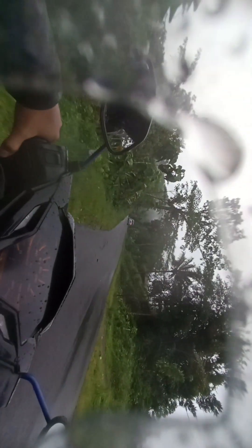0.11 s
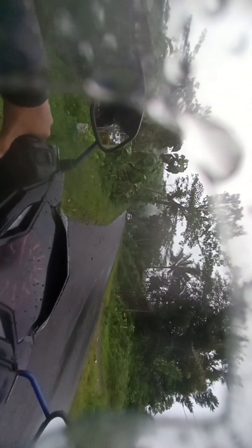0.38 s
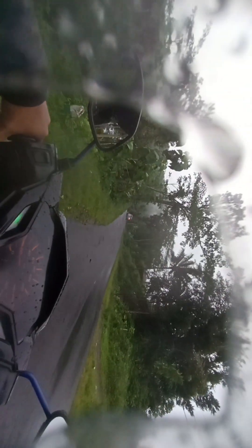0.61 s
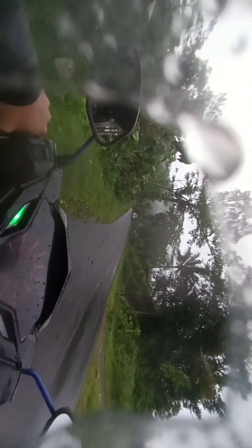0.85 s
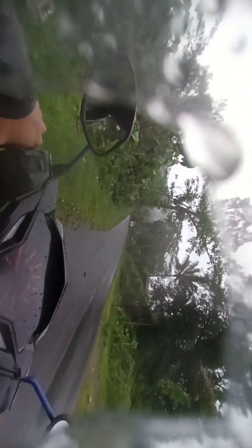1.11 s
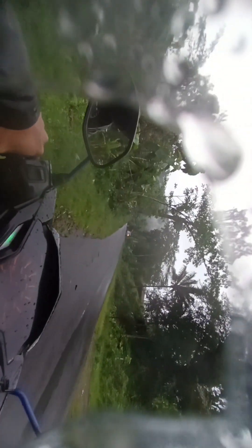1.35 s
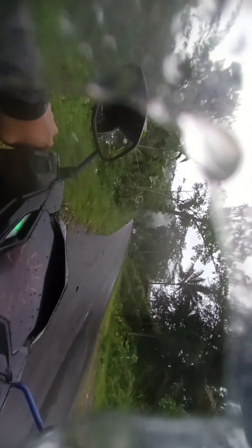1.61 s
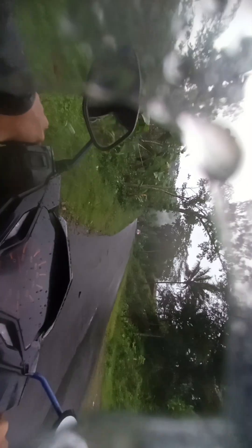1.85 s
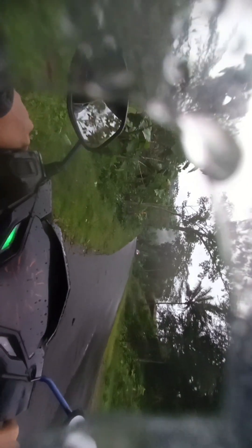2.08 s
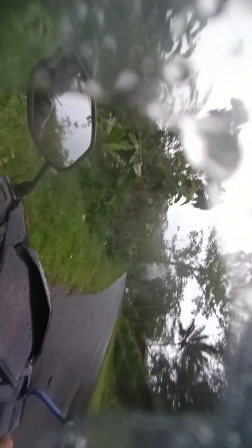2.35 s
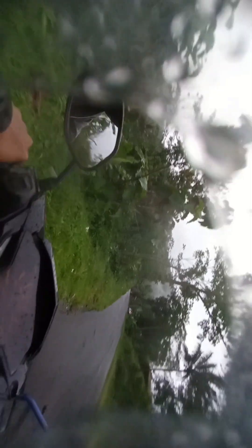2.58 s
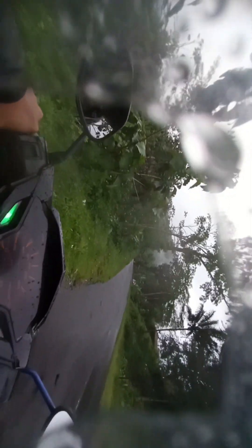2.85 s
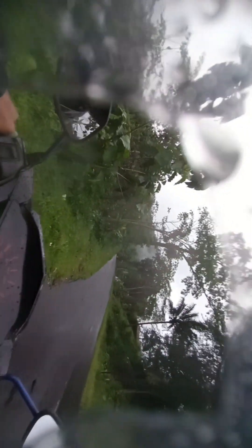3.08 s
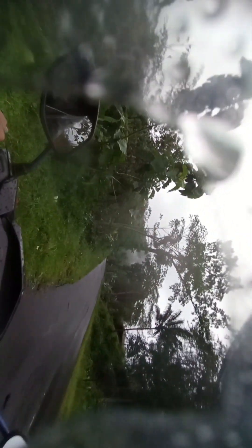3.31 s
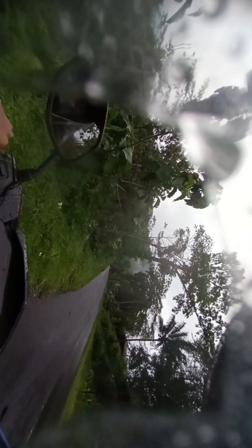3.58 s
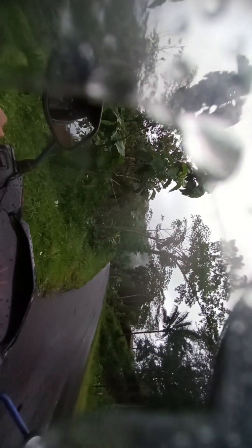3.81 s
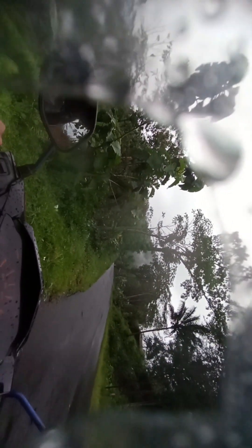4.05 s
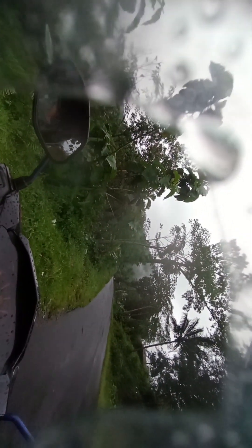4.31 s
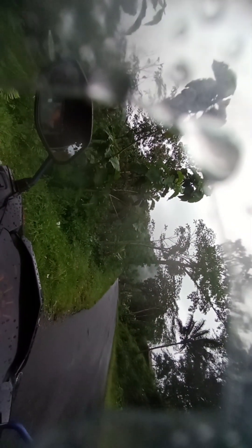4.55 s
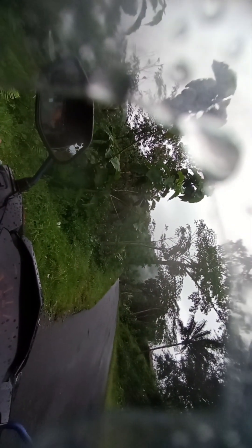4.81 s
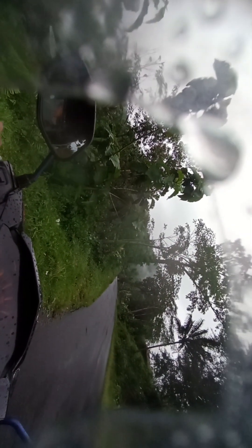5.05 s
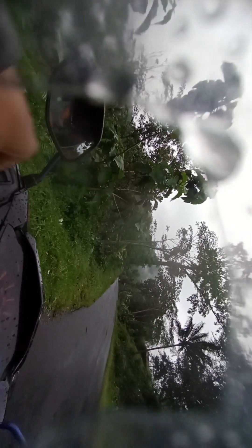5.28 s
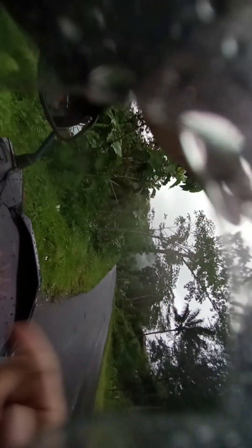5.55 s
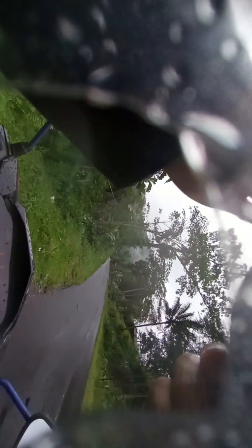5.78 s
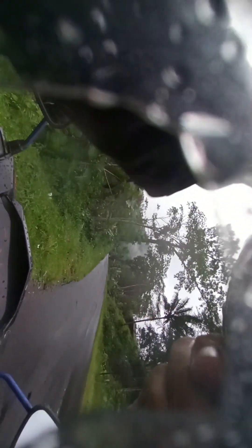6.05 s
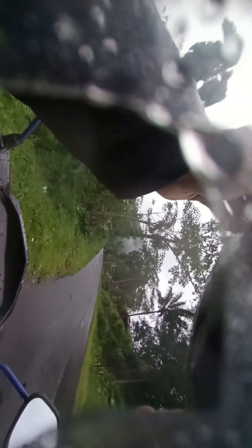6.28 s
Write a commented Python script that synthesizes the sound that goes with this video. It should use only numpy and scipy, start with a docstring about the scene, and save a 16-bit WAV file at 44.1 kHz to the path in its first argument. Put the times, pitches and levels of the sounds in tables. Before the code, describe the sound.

Boxy close-up of a motorbike engine dropping into uneven idle thumps, wet fabric rubbing and snapping, then a hand sliding and knocking on the shell.

```python
"""Small motorcycle slowing to idle, heard inside a housing

A single-cylinder engine slows and settles into a lumpy idle, heard from inside a sealed plastic housing.
Exhaust beats are gas puffs with echo, pipe ring and frame throb; shaken panels are resonated random clicks.
The brake squeaks faintly (wavering sines); wet cloth rubs, crackles and snaps (shaped clicks and noise).
Near the end a hand slides over the shell (banded hiss) and knocks on it (decaying modes)."""
import sys
import numpy as np
from scipy import signal
from scipy.fft import rfft, irfft
from scipy.io import wavfile
from scipy.ndimage import uniform_filter1d

SR = 44100
rng = np.random.default_rng(int(sys.argv[2]) if len(sys.argv) > 2 else 0)


def master(y):
    """Save y as 16-bit WAV."""
    cut = np.clip(np.atleast_2d(y).T, -1, 1)
    pcm = np.round(cut * 32767)  # scale
    wavfile.write(sys.argv[1], SR, pcm.astype(np.int16))


def level_to_linear(level):
    """Convert decibel levels to linear amplitude factors, elementwise."""
    exponent = np.asarray(level, float) / 20
    return 10 ** exponent


N = 282240

# Engine speed. Each row: time in seconds, firings per second.
ENGINE_SPEED = [(0.0, 23.616), (0.5, 21.642), (0.8, 20.448), (1.4, 14.755), (1.8, 12.887), (2.1, 12.479),
                (2.8, 12.801), (3.2, 12.196), (3.5, 13.213), (3.8, 12.221), (4.1, 12.939), (5.0, 12.9),
                (5.3, 13.272), (5.8, 12.226), (6.1, 13.196), (6.4, 12.626)]
IDLE_PER_S = 12.7


def rms_one(x):
    """Scales a signal to rms 1."""
    return x / np.sqrt(np.mean(x ** 2) + 1e-20)


def in_time(rows, outside=None):
    """Columns of a curve, sample by sample."""
    s, *columns = np.transpose(rows)
    return [np.interp(np.arange(N) / SR, s, c, outside, outside) for c in columns]


def drift(rate_hz):
    """Slow chance of spread 1: noise through two equal poles."""
    r = np.exp(-2 * np.pi * rate_hz / SR)
    return rms_one(signal.lfilter([1], [1, -2 * r, r * r], rng.standard_normal(N + SR))[SR:])


def colour(x, spectrum):
    """Weights a signal by a smooth spectrum of (Hz, dB) points."""
    hz, db = np.transpose(spectrum)
    f = np.maximum(np.arange(N // 2 + 1) * SR / N, 1)
    return irfft(rfft(x) * level_to_linear(np.interp(np.log(f), np.log(hz), db)), N)


def band_rms(x, low_hz, high_hz):
    """Rms of one band."""
    power = np.abs(rfft(x)[int(low_hz * N / SR):int(high_hz * N / SR)]) ** 2
    return np.sqrt(2 * power.sum()) / N


def butter_filter(x, order, hz, kind="low"):
    """Causal Butterworth filter."""
    return signal.sosfilt(signal.butter(order, hz, kind, fs=SR, output="sos"), x)


def zero_phase_high_pass(x, order, hz):
    """Butterworth high-pass run forward and backward."""
    return signal.sosfiltfilt(signal.butter(order, hz, "high", fs=SR, output="sos"), x)


def resonate(x, hz, width_hz):
    """One resonance, gain 1 on top."""
    r = np.exp(-np.pi * width_hz / SR)
    poles = [1, -2 * r * np.cos(2 * np.pi * hz / SR), r * r]
    return signal.lfilter([(1 - r * r) / 2, 0, (r * r - 1) / 2], poles, x)


def grains(per_s, spread_db):
    """Random clicks of very uneven size; their power does not depend on the rate."""
    sizes = level_to_linear(spread_db * np.minimum(rng.exponential(1, N), 4)) * rng.choice([-1, 1], N)
    happens = rng.random(N) < per_s / SR
    return rms_one(sizes) * happens * np.sqrt(SR / per_s) + 1e-18


def panels(table, patchy_db, per_s):
    """Every panel is shaken on its own and rings up and fades in patches; rms 1."""
    total = 0
    for hz, width_hz, db in table:
        shaking = grains(900, spread_db=3.0) * level_to_linear(patchy_db * drift(per_s))
        ring = resonate(resonate(shaking, hz, width_hz), hz, 2 * width_hz)
        total = total + level_to_linear(db) * rms_one(ring)
    return rms_one(total)


def patches(x, bands_hz, patchy_db, per_s):
    """Folds move: each band swells and fades on its own."""
    for hz in bands_hz:
        gain = level_to_linear(patchy_db * np.clip(drift(per_s), -3, 2))
        x = x + (gain - 1) * resonate(x, hz, hz / 9)
    return x


def housing(x):
    """Each air or wall resonance of the shell lifts its own band."""
    # Each row: frequency in Hz, width in Hz, lift in dB.
    shell_resonances = [(359, 14, 10), (630, 720, -1), (686, 90, 14), (906, 150, 5.5), (1172, 36, 4.5),
                        (1760, 490, 5), (2600, 310, 1.5), (3680, 970, 8), (3400, 120, -3.5), (6940, 170, 0)]
    for hz, width_hz, lift_db in shell_resonances:
        x = x + (level_to_linear(lift_db) - 1) * resonate(x, hz, width_hz)
    return x


def whistles(touches, rise_share, fade_db, waver, flutter_db):
    """Thin, unsteady tones of rubbing metal: each swells, then fades."""
    out, t = 0, np.arange(N) / SR
    for s, length_s, hz, db in touches:
        corners_s = [s, s + rise_share * length_s, s + length_s]
        level_db = np.interp(t, corners_s, db - np.array([fade_db, 0, fade_db]), -140, -140)
        phase = 2 * np.pi * np.cumsum(hz * (1 + waver * drift(12))) / SR
        out = out + uniform_filter1d(level_to_linear(level_db), size=200) * np.sqrt(2) * np.sin(phase)
    return out * level_to_linear(flutter_db * drift(40))


def brake_squeaks():
    """The brake rubs: faint high tones, quick to swell."""
    # Each row: start in seconds, length in seconds, frequency in Hz, level in dB.
    squeaks = [(1.318, .03, 8400, -61), (2.083, 0.13, 8410, -53), (2.303, .04, 8400, -83),
               (3.58, 0.15, 8500, -65)]
    return whistles(squeaks, rise_share=0.08, fade_db=30.0, waver=.004, flutter_db=5.5)


def frame_creaks():
    """The frame creaks: short tones, slower to swell."""
    # Each row: start in seconds, length in seconds, frequency in Hz, level in dB.
    creaks = [(.87, 0.11, 1260, -44.5), (2.29, 0.051, 2500, -54), (2.47, 0.076, 2500, -64),
              (3.29, 0.11, 1220, -52.5), (3.62, 0.061, 2500, -62)]
    return whistles(creaks, rise_share=0.4, fade_db=8.0, waver=0.0058, flutter_db=4.5)


def hand():
    """Wet skin sliding over the shell drags with a muffled, banded hiss, higher as it slides off."""
    # Each row: time in seconds, level in dB.
    slide = [(5.82, -51), (5.9, -51), (5.95, -47.5), (5.99, -35.5), (6.03, -25), (6.055, -44.5),
             (6.08, -28), (6.2, -46.5), (6.26, -40.5), (6.33, -41.5), (6.4, -42.5)]
    slide_treble = [(6.19, -64), (6.24, -57), (6.3, -58), (6.36, -48.5), (6.4, -43)]
    # Each row: frequency in Hz, width in Hz, level in dB.
    skin_rings = [(1040, 33, 10), (1300, 360, 13.5), (1610, 78, 9), (2600, 320, -14), (1840, 63, -1.5),
                  (2500, 160, 3), (2800, 80, -3), (3280, 74, -16.5)]
    skin_treble = [(1500, 400, 2), (2000, 250, -1), (2500, 200, -2), (2850, 200, 0), (3250, 220, -1),
                   (3900, 300, -10)]
    high = level_to_linear(in_time(slide_treble, outside=-120)[0]) * panels(skin_treble, patchy_db=4.5, per_s=20)
    return level_to_linear(in_time(slide, outside=-120)[0]) * panels(skin_rings, patchy_db=4.0, per_s=10) + high


def knocks():
    """Each blow rings all the shell's modes and leaves a dying rattle; a soft contact takes the top off."""
    # Each row: time in seconds, peak in dB, contact hardness (low-pass) in Hz.
    blows = [(5.775, -16, 450), (5.935, -19, 400), (5.949, -18, 700), (5.959, -8, 900), (5.969, -13, 450),
             (5.99, -5, 700), (5.9945, -10, 600), (5.998, -9, 1500), (6.0176, -.3, 2200), (6.055, -17, 550),
             (6.0926, -.3, 2800), (6.134, -12, 1300)]
    # Struck housing. Each row: frequency in Hz, level in dB, t60 in seconds.
    shell_modes = [(342, -20, .08), (412, 5, 0.049), (582, 5.5, 0.066), (728, 19.5, 0.015),
                   (1100, 10.5, 0.023), (1200, -12, 0.052), (1480, -16.5, 0.029), (1863, 10, 0.019),
                   (2570, -6, 0.018), (3320, -0.5, 0.023)]
    out, t = np.zeros(N + 4000), np.arange(4000) / SR
    hz, mode_db, t60_s = np.transpose(shell_modes)[:, :, None]
    chance_db = rng.standard_normal((len(blows), len(hz), 1))
    shake = butter_filter(rng.standard_normal((len(blows), len(t))), 2, [300, 1800], "band")
    for (s, db, hard_hz), luck_db, noise in zip(blows, chance_db, shake):
        blow = -np.sum(level_to_linear(mode_db + luck_db - 60 * t / t60_s) * np.sin(2 * np.pi * hz * t), axis=0)
        blow += (level_to_linear(-2 - 60 * t / .02) + level_to_linear(-11 - 60 * t / .12)) * noise
        blow = butter_filter(blow, 3, hard_hz)
        blow = butter_filter(blow, 2, 240, "high")
        at = round(s * SR)
        out[at:at + len(t)] += level_to_linear(db) * blow / np.abs(blow).max()
    return out[:N]


def snaps():
    """Each sharp snap of the cloth is a short noise burst around its own pitch, with a softer rustle."""
    # Each row: time in seconds, burst level in dB, pitch in Hz.
    cloth_snaps = [(0.0679, -26, 3700), (0.0665, -32, 6300), (2.1882, -36.5, 6000), (2.2106, -37.5, 5800),
                   (2.6843, -44, 1970), (2.6928, -34, 3450), (3.6147, -37, 4100), (3.9733, -30.5, 4200),
                   (4.316, -28.5, 2730), (4.326, -29, 3600), (4.384, -37, 5360), (4.3914, -39, 3880),
                   (4.44, -39, 3450), (4.462, -33, 3400), (4.4777, -29, 3300), (4.4984, -23.5, 3750),
                   (4.5152, -22.5, 3380), (4.5322, -25.5, 3230), (4.5428, -27.5, 3280), (4.6179, -27, 3500),
                   (4.628, -19.5, 3850), (4.6382, -27, 3180), (4.6606, -38, 3670), (4.672, -26.5, 3300),
                   (4.68, -25.5, 3380), (4.694, -29.5, 3480), (4.7037, -31, 3020), (4.74, -36.5, 3840),
                   (4.8184, -38, 3800), (4.845, -38, 3790), (4.8985, -41, 3670), (5.0548, -37, 2070),
                   (5.0728, -34, 3340), (5.1, -29.5, 3280), (5.1257, -33, 3280), (5.1356, -39, 3330),
                   (5.2971, -26.5, 3150), (5.3498, -26, 1970), (5.351, -26.5, 7000), (5.405, -30, 4900),
                   (5.538, -38, 6560), (5.554, -33, 6200), (5.57, -48, 6600), (5.593, -27, 6650),
                   (5.712, -35, 6600)]
    burst_t60_s, edge_db = 0.0044, -11   # edge: wide-band part of the burst
    rustle_t60_s, rustle_db = 0.054, -16
    out, t = np.zeros(N + 4000), np.arange(4000) / SR
    for (s, db, hz), noise in zip(cloth_snaps, rng.standard_normal((len(cloth_snaps), len(t)))):
        burst = noise * level_to_linear(-60 * t / burst_t60_s)
        snap = rms_one(resonate(burst, hz, hz / 4)) + level_to_linear(edge_db) * rms_one(np.gradient(burst))
        rustle = rms_one(resonate(noise[::-1], hz, hz / 8))
        snap = snap / np.abs(snap).max() + level_to_linear(rustle_db - 60 * t / rustle_t60_s) * rustle
        at = round(s * SR)
        out[at:at + len(t)] += level_to_linear(db) * snap
    air = butter_filter(out[:N], 4, [12600, 15500], "band")
    return butter_filter(out[:N], 6, 7800) + air


def pressure_db(start_s, peak_s, length_s):
    """One stroke of the cloth, 0 dB at its hardest: lands, presses up to its peak, eases, lifts off."""
    touch_s, touch_db, leave_db, lift_s = 0.0041, -10.5, -14.5, 0.042
    end_s = max(length_s, peak_s)
    corners_s = start_s + np.array([-touch_s, 0, peak_s, end_s, end_s + lift_s])
    return np.interp(np.arange(N) / SR, corners_s, [-30, touch_db, 0, leave_db, -40], -140, -140)


def crinkle(clicks):
    """Each click frays into noise over a few ms and rings in one fold; the colour shifts as folds move."""
    # Each row: frequency in Hz, t60 in seconds, level in dB.
    fold_rings = [(1620, .04, 3), (2030, .04, -7.5), (2250, .04, -2.5), (2980, 0.051, 8), (3600, .04, 3.5),
                  (4260, 0.069, -8), (2810, 0.025, -2), (3260, 0.073, 18.5), (3800, 0.096, 13),
                  (4300, 0.031, -5), (5450, 0.051, 4), (6630, 0.075, -7.5), (6900, 0.033, 1.5)]
    # Bands into which single crackles fall. Each row: frequency in Hz, level in dB.
    crackle_bands = [(1700, -6), (2300, -1.5), (2900, -6), (3500, -1.5), (4200, -1), (5200, -17), (6300, 3),
                     (7400, 5), (13500, 8.5)]
    # Each row: frequency in Hz, weight in dB.
    crackle_spectrum = [(880, -28), (1500, 9.5), (1810, -11.5), (2040, 1.5), (2250, -1.5), (3270, -3.5),
                        (4890, -6.5), (7040, -3.5), (7850, -13), (9100, -49), (9900, -54.5), (10600, -33),
                        (12100, -35.5), (12900, -20.5), (14000, -16.5), (15300, -15), (16000, -32.5)]
    # Fold frequencies in Hz.
    folds_hz = (1900, 2200, 2550, 2900, 3300, 3750, 4250, 4800, 5500, 6200, 6900, 7600)
    fold = rng.integers(0, len(fold_rings), N)
    fade = level_to_linear(-60 / (.005 * SR))
    fray = signal.lfilter([.2], [1, -fade], np.abs(clicks)) * rng.standard_normal(N)
    frayed = clicks + fray
    band = rng.integers(0, len(crackle_bands), N // 200 + 1)[np.arange(N) // 200]   # redrawn every few ms
    dealt = 0
    for k, (hz, db) in enumerate(crackle_bands):
        dealt = dealt + level_to_linear(db) * resonate(frayed * (band == k), hz, hz / 1.5) * np.sqrt(SR / hz)
    out = housing(colour(dealt + level_to_linear(4.0) * frayed, crackle_spectrum))
    out = out / band_rms(out, 2500, 8000)
    out = patches(out, folds_hz, patchy_db=4.5, per_s=15)
    rings = 0
    for k, (hz, t60_s, db) in enumerate(fold_rings):
        ring = resonate(clicks * (fold == k), hz, np.log(1000) / np.pi / t60_s)
        rings = rings + level_to_linear(db) * np.sqrt(hz * t60_s) * ring
    rings = butter_filter(rings, 6, 8000)
    return out + level_to_linear(-7) * rings / band_rms(rings, 2500, 8000)


def cloth():
    """Stick and slip: separate crackles that crowd as the stroke gets harder, over a duller scrub."""
    # Each row: start in seconds, seconds to the hardest moment, length in seconds, crackle level in dB,
    # dull rub in dB over the crackle, treble lift in dB.
    rubs = [(0.059, 0.011, 0.0097, -31.5, 5, -0.5), (2.185, 0.0028, 0.04, -62, 2, -11),
            (2.274, 0.028, 0.08, -50, 14.5, 3.5), (2.38, 0.014, 0.13, -64.5, -5, 6),
            (2.679, 0.054, 0.11, -47, 14, -3.5), (2.955, 0.025, 0.053, -43, -1, -6.5),
            (3.034, 0.039, 0.28, -40.5, 6.5, 1), (3.195, 0.037, 0.083, -34, 11.5, -4.5),
            (3.597, 0.054, 0.13, -52.5, -12, -0.5), (3.816, 0.11, 0.14, -47, -3.5, 2),
            (3.985, 0.042, .3, -35, 0, -3), (4.066, 0.11, 0.21, -34, 9, -2),
            (4.22, 0.062, .11, -39.5, -6.5, 4.5), (4.388, 0.017, 0.052, -49.5, -10, -1.5),
            (4.429, 0.041, 0.053, -46, -5, -3), (4.495, 0.06, 0.063, -41.5, -3, 0),
            (4.608, 0.042, .031, -46.5, 11.5, 8.5), (4.68, 0.043, 0.013, -43, 3, 3.5),
            (4.733, 0.0077, 0.055, -50.5, -11, 2), (4.827, 0.0027, 0.031, -48.5, -17, -13),
            (4.897, 0.0059, 0.054, -58.5, -18, 1.5), (4.99, .019, 0.028, -51, -10, 8),
            (5.051, .012, 0.12, -42.5, 0, -2), (5.229, .03, 0.066, -55, 10, -10),
            (5.284, 0.032, 0.07, -37.5, 3.5, -6), (5.319, 0.077, 0.13, -35.5, 14.5, -8),
            (5.457, 0.0075, 0.05, -47.5, 13, -1.5), (5.526, 0.027, 0.13, -42.5, -7, 0.5),
            (5.551, 0.051, 0.18, -39.5, 8, -12), (5.669, 0.077, .06, -39.5, 7.5, -7),
            (5.738, 0.036, 0.12, -42, 16.5, 0), (6.132, 0.014, 0.025, -38, 17.5, -1.5),
            (6.149, 0.016, 0.03, -28.5, 6.5, 1), (6.19, 0.035, 0.082, -57, 20.5, 6)]
    # Each row: frequency in Hz, weight in dB.
    dull_spectrum = [(150, -52), (250, -30), (372, 6), (706, 1), (788, 0.5), (1240, 6), (2060, -8),
                     (3500, -12), (4550, -30), (7700, -120)]
    # Fold frequencies in Hz.
    scrub_folds_hz = (800, 1000, 1200, 1450, 1750, 2100, 2550, 3100)
    dull_steepness, snag_db = 1.33, 2   # the dull rub follows pressure more steeply; the drag snags unevenly
    treble_hz = 4270
    bright, dull, treble = 1e-9, 0, 1e-9
    for start_s, peak_s, length_s, db, over_db, treble_db in rubs:
        press_db = pressure_db(start_s, peak_s, length_s)
        bright = bright + level_to_linear(db + press_db)
        dull = dull + level_to_linear(db + over_db + dull_steepness * press_db)
        treble = treble + level_to_linear(db + press_db + treble_db)
    treble_gain = treble / bright
    bright = bright * level_to_linear(snag_db * drift(24))
    per_s = np.clip(220 * (bright / level_to_linear(-45)) ** .6 * level_to_linear(5.5 * drift(30)), 60, 3000)
    clicks = bright * (grains(per_s, spread_db=2.5) + level_to_linear(-11) * rng.standard_normal(N))
    size = band_rms(clicks, 2500, 8000)
    scrub = housing(colour(grains(2600 * level_to_linear(3.0 * drift(53)), spread_db=0.5), dull_spectrum))
    scrub = patches(scrub, scrub_folds_hz, patchy_db=4.5, per_s=13)
    crackle = crinkle(clicks)
    crackle += (treble_gain - 1) * zero_phase_high_pass(crackle, 2, treble_hz)
    return 0.95 * size * crackle + dull * scrub / band_rms(scrub, 420, 2600)


def jolts():
    """A panel is knocked through the frame: quick rise, beating pair of close modes, short decay."""
    # Each row: time in seconds, level in dB, frequency in Hz.
    frame_jolts = [(0.816, -33, 680), (0.877, -22.5, 706), (1.082, -19.5, 570), (1.243, -43, 705),
                   (1.486, -35, 660), (1.575, -27, 492), (1.669, -29, 624), (2.477, -24, 623),
                   (2.511, -27, 555), (2.595, -39, 700), (3.311, -25, 659), (3.781, -44, 720),
                   (3.86, -37, 695), (4.756, -29, 675), (4.988, -37, 665), (5.084, -21, 750)]
    t60_s, rise_s = 0.06, 0.0018
    out, t = np.zeros(N + 8000), np.arange(8000) / SR
    for (s, db, hz), (apart, turn) in zip(frame_jolts, rng.random((len(frame_jolts), 2))):
        second = np.sin(2 * np.pi * (hz * (1.03 + .06 * apart) * t + turn))
        pair = np.sin(2 * np.pi * hz * t) + .5 * second
        at = round(s * SR)
        out[at:at + len(t)] += level_to_linear(db - 60 * t / t60_s) * (1 - np.exp(-t / rise_s)) * pair
    return out[:N]


def firings():
    """Moments in seconds at which the turning engine completes a cycle."""
    first_firing_s = .0368
    t = np.arange(N) / SR
    cycles = np.cumsum(in_time(ENGINE_SPEED)[0]) / SR
    cycles = cycles - np.interp(first_firing_s, t, cycles)
    return np.interp(np.arange(int(cycles[-1]) + 1), cycles, t)


def running_gear():
    """Engine and frame shake the panels: humming patches over a wide drone, fine rattle, valve clatter."""
    # Each row: time in seconds, main panels in dB, then low, middle and upper panels in dB over them.
    hum_levels = [(0, -32, 2, 2.5, 2.5), (.4, -37, 1.5, 4.5, -6), (.85, -35, -7, -3, -19),
                  (1.2, -40.5, 1, 5.5, -17), (1.5, -44.5, -9.5, 0, -14), (1.95, -49.5, 7, 3, -19),
                  (2.3, -46, -13, 6, -4), (2.52, -47, 0, 4, -16.5), (2.8, -43.5, 5, -0.5, -11),
                  (3.2, -37.5, -6, -9.5, -21), (3.5, -48, 6, -21, -16), (3.85, -42, -10, -8.5, -22),
                  (4.2, -41.5, -6.5, 3.5, -12.5), (4.75, -37, -5.5, -16, -15), (5.1, -40, 2.5, -10, -17),
                  (5.6, -36.5, -4.5, -8.5, 0), (5.95, -37.5, 4.5, -17.5, -7.5), (6.4, -41, 0.5, -1, -1.5)]
    # Each row: time in seconds, level in dB.
    rattle_levels = [(0, -51), (.36, -60.5), (1.4, -59), (2.1, -64.5), (2.6, -66.5), (3.6, -68),
                     (4.6, -69.5), (5.1, -69), (5.4, -58), (5.8, -62), (6.4, -69)]
    # Each row: frequency in Hz, weight in dB.
    drone_spectrum = [(35, -37), (60, -8.5), (141, -3), (231, -8), (422, -40), (637, -20.5), (839, -39.5),
                      (1600, -30), (2080, -83), (3520, -120)]
    rattle_spectrum = [(530, -14.5), (900, -0.5), (1080, -11.5), (1240, -12), (1370, -14), (1580, -17),
                       (2100, -12.5), (3600, -17.5), (4980, -33.5), (6640, -27), (8230, -47),
                       (11000, -46.5), (12800, -40.5), (15700, -50)]
    # Panels of frame and shell, then valve cover. Each row: frequency in Hz, width in Hz, level in dB.
    low_panels = [(280, 13, -3), (311.6, 36.5, 9), (375.4, 26, 4.5)]
    middle_panels = [(483, 89, 4.5), (542.6, 20, -4.5), (578.7, 23, 1.5)]
    main_panels = [(659, 54, 2), (706, 15, -1), (757, 30, -2.5)]
    upper_panels = [(867, 34, 7.5), (959, 77, 7.5), (1030, 320, -4.5)]
    high_panels = [(1215, 22, 6), (1288, 35, 8), (1460, 47, -2), (1800, 290, -2.5), (2100, 74, -17.5),
                   (2430, 41, -7), (3030, 28, -8), (3400, 270, -4), (3630, 26, -11), (6770, 140, -16)]
    clatter_panels = [(1475, 89, -3.5), (1663, 21, -0.5), (1790, 130, -8.5), (2410, 59, -12.5),
                      (3970, 96, -15)]
    idle_clatter_db, clatter_db_per_octave, clatter_pulse_db = -73, 26, 1

    main_db, low_db, middle_db, upper_db = in_time(hum_levels)
    rattle_db, = in_time(rattle_levels)
    speed = in_time(ENGINE_SPEED)[0] / IDLE_PER_S
    times = firings()
    turn = 2 * np.pi * np.interp(np.arange(N) / SR, times, np.arange(len(times)))
    stroke = np.cos(turn + .8)   # one swell a cycle

    drone = rms_one(colour(grains(1500, spread_db=7.0), drone_spectrum))
    hum = panels(main_panels, patchy_db=3.0, per_s=10) + level_to_linear(-5.0) * drone
    hum += level_to_linear(low_db) * panels(low_panels, patchy_db=3.5, per_s=5)
    hum += level_to_linear(middle_db) * panels(middle_panels, patchy_db=4.5, per_s=7)
    hum += level_to_linear(upper_db) * panels(upper_panels, patchy_db=3.5, per_s=9)
    hum *= level_to_linear(main_db + 0.31 * np.cos(turn - 2.5))

    rattle = colour(grains(2800, spread_db=1.5), rattle_spectrum)
    rattle = rattle / band_rms(rattle, 1500, 4500) + level_to_linear(5) * panels(high_panels, patchy_db=4.5, per_s=12)
    rattle *= level_to_linear(.7 * speed * stroke) * level_to_linear(rattle_db)

    clatter_db = idle_clatter_db + clatter_db_per_octave * np.log2(speed) + clatter_pulse_db * stroke
    clatter = level_to_linear(clatter_db) * panels(clatter_panels, patchy_db=9.0, per_s=20)
    return clatter + hum + rattle


def firing_db(times):
    """Full and short firings alternate; a few come weaker or stronger than the pattern."""
    # Each row: time in seconds, full firing in dB, shortfall of every other firing in dB.
    firing_levels = [(0, -12, -0.5), (.25, -11.5, 1), (.4, -15, -1), (.65, -13, -1), (.92, -16.5, -1),
                     (1.13, -16.5, 2.5), (1.25, -20, 4), (1.38, -33, 2), (1.51, -27.5, -1),
                     (1.648, -20.5, 0.5), (2.05, -25, 7), (2.3, -22.5, -1), (2.5, -28.5, -1),
                     (2.8, -22, 18), (3.05, -21, 3.5), (3.4, -25, 5), (3.65, -19.5, 16), (4.1, -22.5, 3),
                     (4.6, -21.5, 6.5), (5.3, -21.5, 11), (5.9, -16.5, 20), (6.13, -25, 19),
                     (6.4, -29.5, -11)]
    # Firings off the pattern. Each row: time in seconds, level drop in dB (negative for a stronger beat).
    uneven_firings = [(.296, 13), (1.736, 11.5), (1.891, 11), (2.208, 13), (2.367, 3.5), (2.525, 3),
                      (2.997, -3.5), (3.156, 24), (3.241, -1.5), (3.552, 2), (3.87, 13), (4.494, 10.5),
                      (4.649, -6), (4.804, 18), (5.416, 4)]
    rhythm_slips_s = 3.2   # strong and weak turns swap here
    idle_scatter_db = 1.2   # falls with the square of speed
    s, full_db, short_db = np.transpose(firing_levels)
    weak = (np.arange(len(times)) + (times > rhythm_slips_s)) % 2 == 0
    db = np.interp(times, s, full_db) - weak * np.interp(times, s, short_db)
    for at_s, drop_db in uneven_firings:
        db[np.argmin(np.abs(times - at_s))] -= drop_db
    slowness = np.gradient(times) * IDLE_PER_S
    return db + idle_scatter_db * slowness ** 2 * rng.standard_normal(len(times))


def puff(t, width_s):
    """A suck followed by a push of gas, peak 1."""
    return t / width_s * np.exp(.5 - .5 * (t / width_s) ** 2)


def bark(times, beat_db):
    """Every stroke blows a coarse burst of grit into the silencer, with its own mix of resonances."""
    # Each row: frequency in Hz, width in Hz, level in dB.
    silencer_rings = [(412, 104, -1), (617, 130, -2.5), (1028, 97, -9.5), (1284, 90, -10.5),
                      (1600, 89, -13), (1824, 110, -18)]
    under_beat_db, scatter_db, lead_s, rise_s = -28, 6.5, .016, .01
    at = np.clip(np.round((times - lead_s) * SR).astype(int), 0, N - 1)
    r = np.exp(-1 / (rise_s * SR))
    grit, out = grains(1200, spread_db=5.0), 0
    chance = rng.standard_normal((len(times), len(silencer_rings))).T
    for (hz, width_hz, db), luck in zip(silencer_rings, chance):
        strokes = np.full(N, 1e-18)
        strokes[at] = level_to_linear(beat_db + under_beat_db + db + scatter_db * luck)
        gate = signal.lfilter([(1 - r) * np.e], [1, -2 * r, r * r], strokes)
        out = out + gate * rms_one(resonate(resonate(grit, hz, width_hz), hz, 2 * width_hz))
    return out


def exhaust():
    """Valve-opening puff, its echo in the pipe, then the piston's push and a throb of the frame."""
    # Each row: cycle in seconds, valve-open lead in seconds, valve puff share, valve puff width in seconds,
    # pipe echo share, push width in seconds.
    beat_shape = [(0.045, .0105, 1.6, 0.0016, 0.1, .0016), (0.052, 0.0118, 1.55, .0017, 0.12, .0016),
                  (.06, .0135, 1.0, .002, .6, .0017), (0.079, 0.0153, 0.8, 0.002, 0.8, .0018)]
    # Beats after which the frame throbs heavily. Each row: time in seconds, extra level in dB.
    heavy_throbs = [(1.587, 13), (1.812, 15), (2.048, 23), (2.287, 13), (2.446, 11), (2.761, 19), (3.63, 6),
                    (4.262, 6), (4.572, 6), (5.19, 20), (5.341, 9), (5.732, 16), (6.127, 13)]
    base_throb_db, throb_scatter_db = -13, 3
    throb_hz, throb_spread, throb_t60_s = 78, .2, .16   # never twice alike
    pipe_echo_s, pipe_hz, pipe_width_hz, pipe_ring_db = .008, 89, 8.1, -12
    jitter_s, puff_spread = .0014, .11   # at idle; firmer at speed

    times = firings()
    beat_db = firing_db(times)
    cycle_s, *shape = np.transpose(beat_shape)
    lead_s, valve, valve_s, echo, push_s = [np.interp(np.gradient(times), cycle_s, c) for c in shape]
    wobble = rng.standard_normal((len(times), 9))
    wobble[:, [0, 1, 3, 4, 8]] *= (np.gradient(times)[:, None] * IDLE_PER_S) ** 1.3
    throb_db = base_throb_db + throb_scatter_db * wobble[:, 7]
    for at_s, extra_db in heavy_throbs:
        throb_db[np.argmin(np.abs(times - at_s))] = base_throb_db + extra_db

    before = 1600   # samples ahead of each firing
    out, t = np.zeros(N + 8000), np.arange(-before, 6000) / SR
    for k, s in enumerate(times):
        opens = t + lead_s[k] * (1 + .06 * wobble[k, 0])   # time since the valve opened
        stretch = np.exp(puff_spread * wobble[k, 3:5])
        beat = puff(t, push_s[k] * stretch[0])
        beat += valve[k] * level_to_linear(1.5 * wobble[k, 1]) * puff(opens, valve_s[k] * stretch[1])
        beat += echo[k] * level_to_linear(2.2 * wobble[k, 2]) * puff(opens - pipe_echo_s, push_s[k])
        after = np.maximum(opens, 0)
        swing_hz = throb_hz * np.exp(throb_spread * wobble[k, 5])
        throb = np.sin(2 * np.pi * swing_hz * after + np.pi * wobble[k, 6])
        throb *= 1 - np.exp(-(after / 0.022) ** 2)
        beat += level_to_linear(throb_db[k] - 60 * after / throb_t60_s) * throb
        at = max(round((s + jitter_s * wobble[k, 8]) * SR), 0)
        out[at:at + len(t)] += level_to_linear(beat_db[k]) * beat
    out = out[before:before + N]
    out = out + level_to_linear(pipe_ring_db) * resonate(out, pipe_hz, pipe_width_hz)
    return zero_phase_high_pass(out, 1, 40) + bark(times, beat_db)


def scene():
    """Sum of all sources, one channel."""
    metal = brake_squeaks() + frame_creaks()
    touches = hand() + knocks() + snaps() + cloth()
    return (metal + touches + jolts() + running_gear() + exhaust())[None]


def roll_off(x):
    """The treble ends steeply here."""
    return signal.sosfilt(signal.butter(12, 16100, fs=SR, output="sos"), x)


def record(dry):
    """A look-ahead limiter ducks just before the loudest blows and rounds peaks; the mic drops deep bass."""
    ahead = round(.014 * SR)
    over = (np.abs(dry[0]) > .75).astype(float)
    count = np.concatenate([[0], np.cumsum(over), np.full(ahead, over.sum())])
    coming = count[ahead:ahead + N] > count[:N]
    passing = count[60:60 + N] > count[np.maximum(np.arange(N) - ahead, 0)]
    duck = uniform_filter1d((coming & ~passing).astype(float), size=40)
    held = 1.5 * np.tanh(dry * level_to_linear(-20 * duck) / 1.5)
    return roll_off(zero_phase_high_pass(held, 2, 35))


dry = scene()
out = record(dry)
master(out)
```